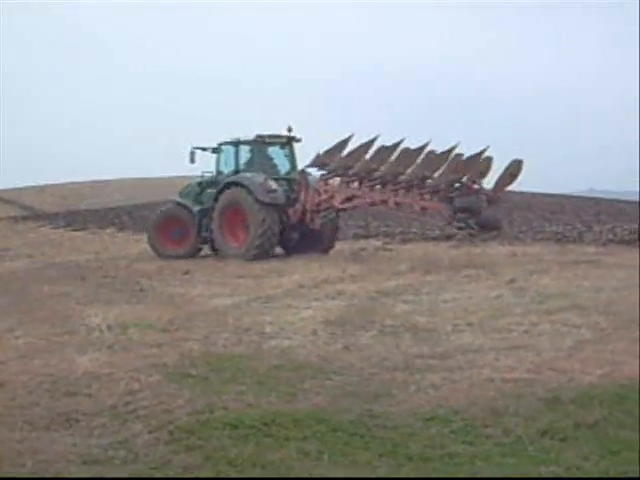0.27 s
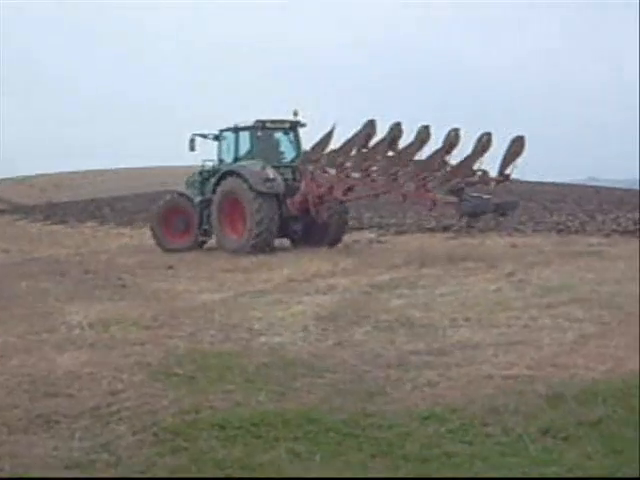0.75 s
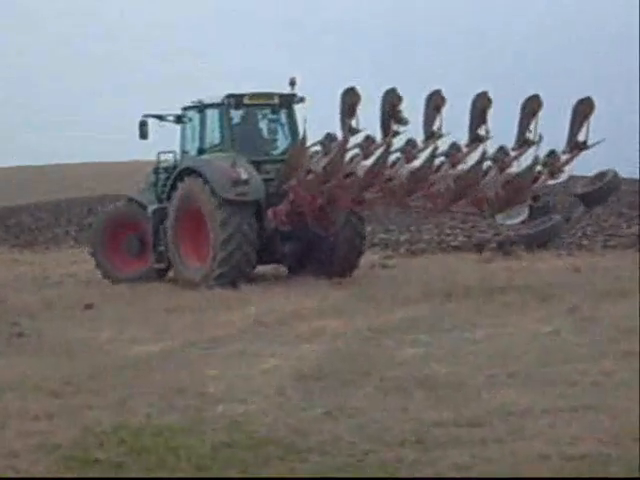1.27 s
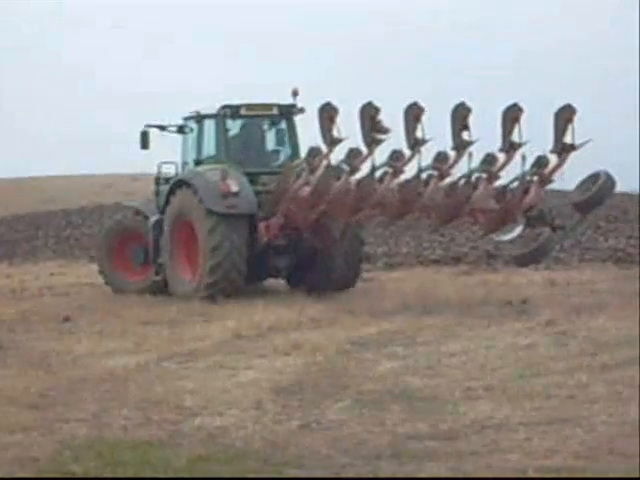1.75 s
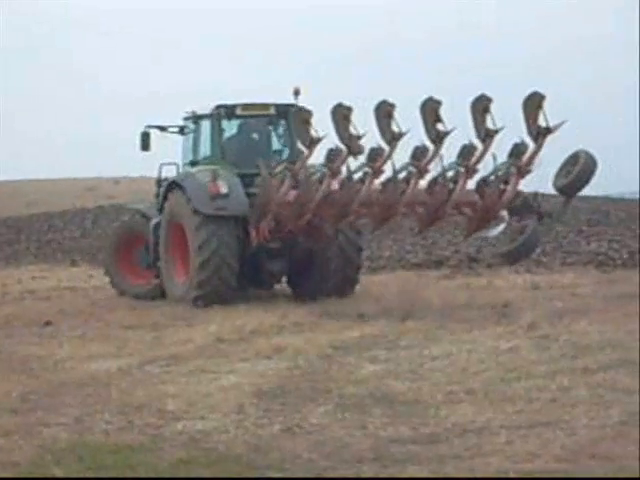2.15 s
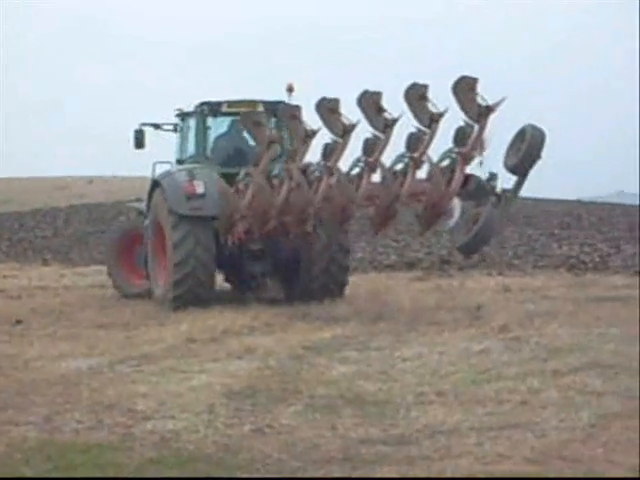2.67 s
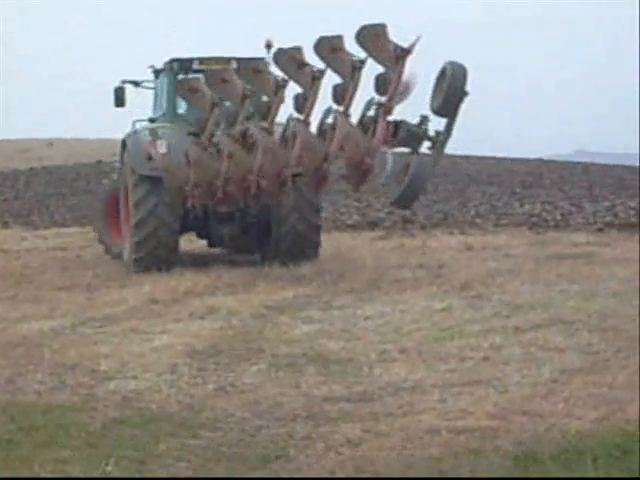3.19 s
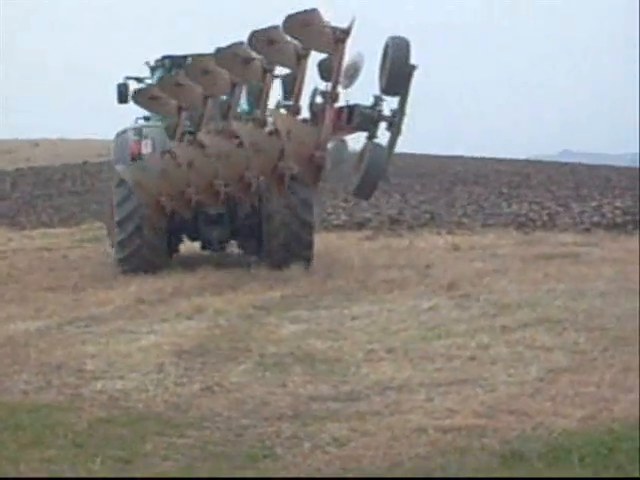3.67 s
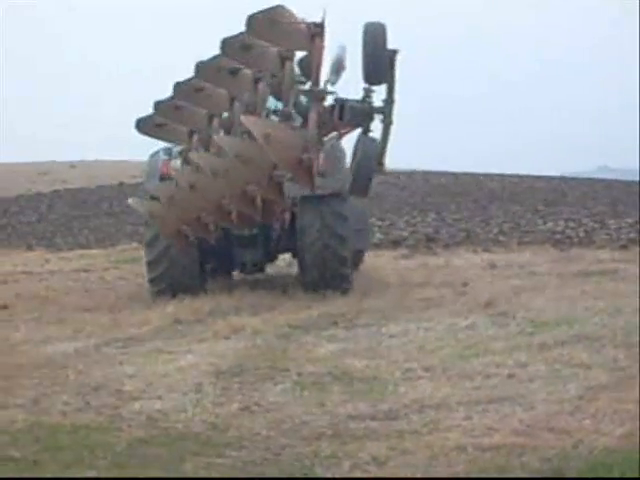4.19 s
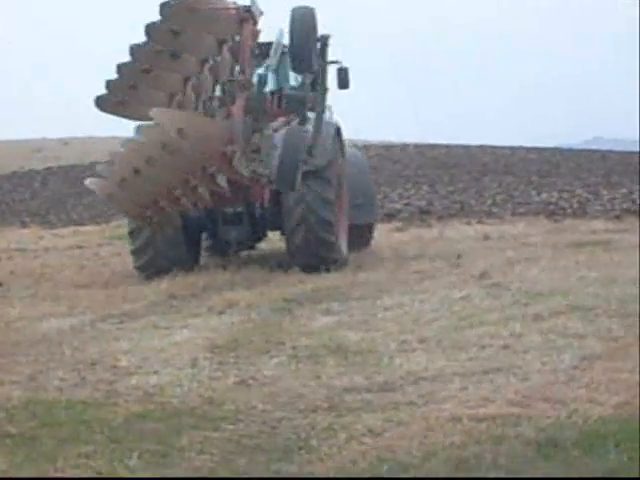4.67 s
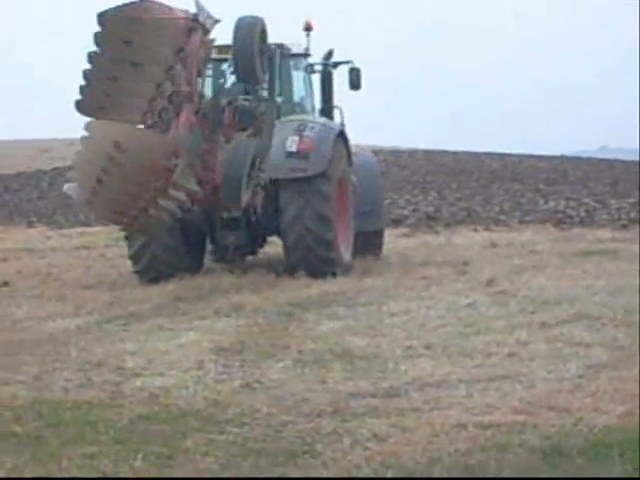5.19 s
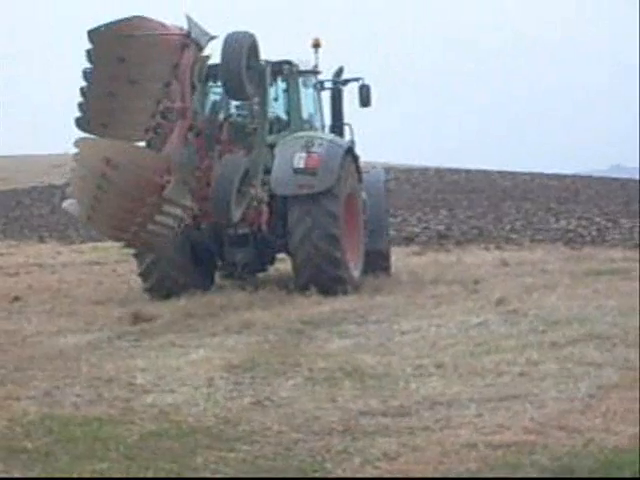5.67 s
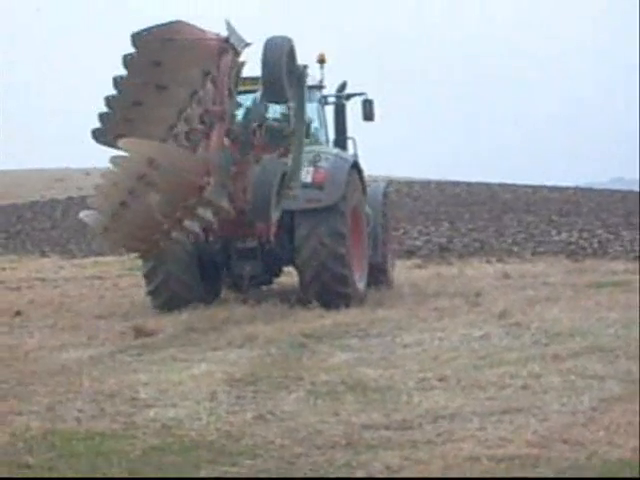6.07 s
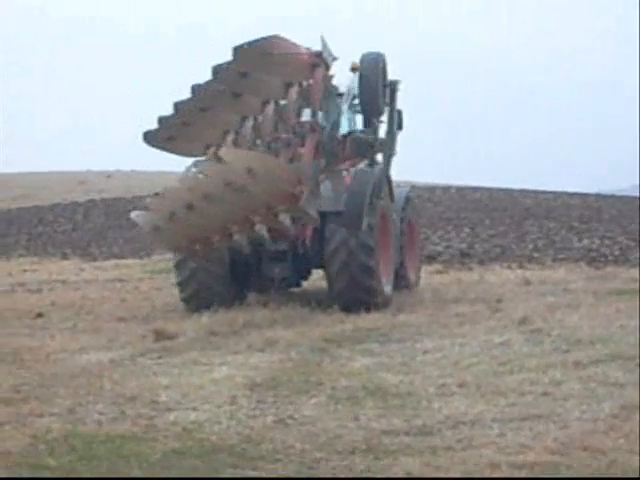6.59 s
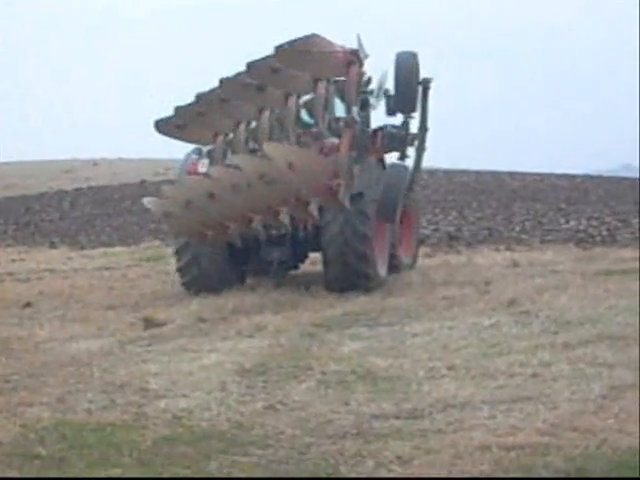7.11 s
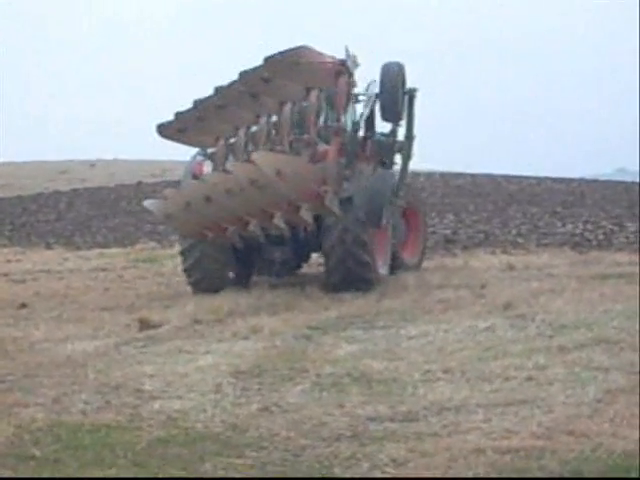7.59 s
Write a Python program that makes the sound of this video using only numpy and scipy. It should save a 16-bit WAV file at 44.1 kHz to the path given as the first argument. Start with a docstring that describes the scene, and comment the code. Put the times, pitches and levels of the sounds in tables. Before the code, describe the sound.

Outdoors, some way off, a big diesel tractor holds a nearly constant speed for about 8 seconds, a low 60-hertz hum under grainy engine noise and bright mechanical clatter. Treble hiss is strong at first, with small steel clanks at 0.1, 0.25 and 0.45. At 0.6 everything cuts to silence, returning abruptly at 1.5 with hydraulic whine and fan tones. Light clanks cluster from 1.6 to 2.5, with faint ones near 3.4. Rapid shaft knocking, about 22 per second, grows clearer as the tractor turns. Firmer clanks come at 4.2, the loudest at 4.7, with more until 5.0. The pump whine eases after 4.2, fan tones thin around 5, and hiss swells towards 5.6, with a thin tick at 5.5. More rattles follow at 5.8, a sharp clank at 6.35 and faint ones until 6.8. The engine continues, fan whine rising again near 7.4. Dry small-camera sound.

```python
"""At a field edge, some way off, a six-cylinder diesel tractor turns, its raised plough rolling over.
Exhaust beats, fan, gear and hydraulic pump tones follow the engine speed; filtered noise makes the
rumble, block noise and clatter. A shaft knocks once a turn, a treble hiss swells and sinks, and steel
parts clank as noise bursts with ringing modes. A small camera microphone drops out for a moment."""
import sys
import numpy as np
from scipy import signal
from scipy.fft import rfft, irfft
from scipy.io import wavfile
from scipy.ndimage import uniform_filter1d

SR = 44100
rng = np.random.default_rng(int(sys.argv[2]) if len(sys.argv) > 2 else 0)


def unload_audio(sound):
    """Save the sound as a 16-bit wav file, at the path given as the first command line argument."""
    columns = np.transpose(np.atleast_2d(sound))
    # keep every value between -1 and 1, then stretch to whole-number steps
    steps = np.round(np.clip(columns, -1, 1) * 32767)
    wavfile.write(sys.argv[1], SR, steps.astype(np.int16))


N = 346185


def undb(db):
    """Gain of a level in dB."""
    return 10 ** (np.asarray(db) / 20)


def curves(table):
    """Each column of a table against time, sample by sample."""
    s, *columns = np.transpose(table)
    return [np.interp(np.arange(N) / SR, s, c) for c in columns]


def white(n=N):
    """White noise of rms 1."""
    return rng.standard_normal(n)


def colour(x, points):
    """x shaped by (Hz, dB) points; white noise comes out at rms 1."""
    hz, db = np.transpose(points)
    f = np.maximum(np.arange(len(x) // 2 + 1) * SR / len(x), 1)
    gain = undb(np.interp(np.log(f), np.log(hz), db, left=-120, right=-120))
    return irfft(rfft(x) * gain / np.sqrt(np.mean(gain ** 2)), len(x))


def band(x, lo_hz, hi_hz):
    """Steep causal band-pass."""
    return signal.sosfilt(signal.butter(4, [lo_hz, hi_hz], "bandpass", fs=SR, output="sos"), x)


def walk(rate):
    """Random levels held 1 / rate s and smoothed twice; spread near 1."""
    k = int(SR / rate)
    steps = np.repeat(rng.standard_normal(400), k)[:N]
    return 1.3 * uniform_filter1d(uniform_filter1d(steps, k), k)


def sine(cycles, db):
    """A sine of rms level db, its phase given in cycles."""
    return np.sqrt(2) * undb(db) * np.sin(2 * np.pi * cycles)


def tone(cycles, db, waver_db, rate):
    """A tone around rms level db whose size and phase wander."""
    level_db = db + waver_db * walk(rate)
    return sine(cycles + 0.11 * walk(rate), level_db)


# course of the treble hiss: t/s, level/dB
HISS_SWELL_LEVEL = [(0, -54.5), (.6, -55.5), (2, -65), (3.9, -67), (4.3, -59), (5.6, -55.5), (6.7, -61),
                    (7.85, -63)]
# spectrum of the treble hiss: f/Hz, relative level/dB per Hz
HISS_SWELL_COLOUR = [(2900, -20.5), (3400, 5.5), (4100, -6), (5000, -11), (6500, -20), (8500, -23),
                     (11500, -29.5), (15500, -25.5)]


def hiss_swell():
    """Treble hiss that swells and sinks, as if the camera's gain moved, and flickers slightly."""
    return undb(curves(HISS_SWELL_LEVEL)[0] + 1.5 * walk(16)) * colour(white(), HISS_SWELL_COLOUR)


# thin sharp ticks: t/s, level before the band-pass/dB
TICK_EVENTS = [(0.4025, -46), (5.535, -35)]


def ticks():
    """Noise bursts that decay with a half-millisecond time constant, with no bass."""
    out, t = np.zeros(N), np.arange(200) / SR
    for s, level_db in TICK_EVENTS:
        i = int(s * SR)
        out[i:i + len(t)] = undb(level_db) * white(len(t)) * np.exp(-t / .0005)
    return band(out, 4000, 12000)


# steel on steel: t/s, nominal peak level/dB, then relative to it: low part level/dB, high part level/dB,
# own note f/Hz, own note level/dB; rise/s, t60/s
CLANK_EVENTS = [(.079, -31.5, -10, -23, 3810, -13, .005, .09),
                (0.2426, -26.5, -16.5, -29.5, 1540, -16, 0.0068, 0.2),
                (0.436, -32, -30, -31, 2510, -8, 0.0053, .15),
                (1.599, -27.5, -5.5, -29, 1413, -9.5, .003, 0.065),
                (1.619, -29, -13, -32, 2950, -10, 0.0041, 0.14),
                (1.661, -29.5, -18, -34, 2320, -8, .0045, .1), (1.672, -31, -24, -19, 2640, 3, .003, 0.054),
                (1.733, -29.5, -28, -36, 2650, -4, .006, .08),
                (2.079, -33.5, -11, -23, 4040, -15, 0.0053, .13),
                (2.181, -39, -13, -24, 5460, -26, 0.0064, 0.15),
                (2.251, -33, -16, -31, 4580, -26, .004, 0.14),
                (2.445, -31.5, -23, -22, 3540, -2.5, 0.0048, 0.045),
                (3.381, -41, -22, -24, 3620, -20, .0045, .1),
                (3.488, -41, -28, -16, 3600, 5.5, 0.0031, 0.075),
                (4.193, -24, -11.5, -22, 4580, -20, 0.01, 0.073),
                (4.267, -26.5, -10, -30, 1590, -5, 0.01, .13),
                (4.727, -17, -13.5, -31, 1309, -16, 0.0048, 0.15),
                (4.817, -30.5, -15, -27, 3460, -22, 0.0045, 0.11),
                (4.891, -23, -30, -32, 2880, -7, .003, 0.084),
                (4.929, -28.5, -11, -32, 1210, -27, .006, 0.41),
                (4.964, -27.5, -15, -25, 3520, -22, .006, 0.12),
                (5.813, -26.5, -17, -31, 3430, -18, .005, .065),
                (5.8644, -33, -20, -33, 2930, 3, 0.0039, 0.056),
                (5.921, -28, -14.5, -34, 3700, -24, 0.0039, 0.076),
                (6.274, -34.5, -30, -29, 4780, -25, 0.0054, 0.46),
                (6.355, -19, -22.5, -26.5, 2860, -5, .004, 0.15),
                (6.586, -39, -4.5, -36, 880, -1, .015, 0.25),
                (6.661, -33.5, -13, -26, 2060, -13, .005, 0.21),
                (6.778, -39, -6.5, -34, 3700, -10, 0.0041, 0.12)]
# ringing steel modes: f/Hz, relative level/dB, t60/s in a clank whose own t60 is 0.16 s
STEEL_MODES = [(794, -14.5, 0.37), (1292, -3, 0.17), (1615, 1, 0.17), (1926, -5.5, 0.27), (2343, -1, .18),
               (2650, 5.5, 0.083), (2780, 7.5, 0.25), (3100, -10.5, 0.091), (3020, -22.5, 0.14),
               (3370, -10.5, .15), (4170, -24, 0.22), (4240, -25.5, .15), (5000, -27, 0.15)]
# middle of a blow: f/Hz, relative level/dB per Hz
BLOW_COLOUR = [(1900, -14), (2300, -9), (2600, -3.5), (2880, 1.5), (3200, 0), (3600, -13), (4200, -23)]
TOP_BELOW_HIGH_DB = -18


def clanks():
    """Each blow rattles raggedly and rings a new mix of steel modes, plus the struck part's own note."""
    out, t = np.zeros(N + SR // 4), np.arange(SR // 4) / SR
    hz, db, ring = np.transpose(STEEL_MODES)[:, :, None]
    for s, peak_db, low_db, high_db, own_hz, own_db, rise, t60 in CLANK_EVENTS:
        noise = white(len(t))
        mix = rng.standard_normal((3, len(STEEL_MODES), 1))
        swell = np.sin(np.pi / 2 * np.minimum(t / rise, 1)) ** 2
        # loose parts chatter every few ms, so the tail is ragged
        jumps = np.interp(t, np.arange(200) * 0.003, rng.standard_normal(200))
        chatter = undb(4.0 * jumps * np.minimum(t / 0.012, 1))
        fall = 1000 ** (-np.maximum(t - rise, 0) / t60) * chatter
        middle = 0.57 * colour(noise, BLOW_COLOUR)
        low = 3.3 * undb(low_db) * band(noise, 580, 2900)
        high = 3.9 * undb(high_db) * band(noise, 3000, 5730)
        top = 2.14 * undb(high_db + TOP_BELOW_HIGH_DB) * band(noise, 6500, 14000)
        # the treble dies first
        rattle = (middle + low) * fall + (high + top) * fall ** 1.2
        # the lower modes follow the low part of the blow
        size = undb(db + 3.07 * mix[0] + np.where(hz < 2400, low_db + 15.0, 0))
        wave = np.sin(2 * np.pi * hz * (1 + 0.0121 * mix[1]) * t + np.pi * mix[2])
        modes = size * wave * 1000 ** (-t / (ring * t60 / 0.16))
        own = undb(own_db) * np.sin(2 * np.pi * own_hz * t) * 1000 ** (-t / (1.5 * t60))
        i = int((s - rise / 2) * SR)
        out[i:i + len(t)] += undb(peak_db) * swell * (rattle + 0.16 * modes.sum(axis=0) + own)
    return out[:N]


# low rumble: f/Hz, relative level/dB per Hz
RUMBLE_COLOUR = [(15, -33.5), (30, -19.5), (50, -15), (76, -11.5), (97, -6), (141, 0.5), (198, -2),
                 (333, -5), (414, -15.5), (520, -45), (680, -49)]
RUMBLE_DB = -44.5


def rumble():
    """Low noise whose level flutters."""
    return undb(RUMBLE_DB + 1.2 * walk(20)) * colour(white(), RUMBLE_COLOUR)


# bright clatter: f/Hz, relative level/dB per Hz
CLATTER_COLOUR = [(1120, -34), (1900, -8.5), (2080, -4), (2310, -10), (2520, -4), (2860, 2), (2960, 0),
                  (3930, -19), (4280, -21.5), (4620, -27), (5020, -30.5), (7000, -47.5), (9100, -65),
                  (15400, -120)]
CLATTER_DB = -42.5  # before the turn's level change


def clatter(turn_db):
    """Bright noise whose level wavers and follows the turn."""
    return undb(CLATTER_DB + turn_db + .8 * walk(12)) * colour(white(), CLATTER_COLOUR)


# engine block noise: f/Hz, relative level/dB per Hz
BLOCK_COLOUR = [(240, -27.5), (400, -12), (434, -4.5), (470, -6.5), (536, -2), (682, 2.5), (963, -5.5),
                (1020, -5.5), (1320, -3), (1420, 0), (1770, -6.5), (2030, -15), (2300, -6), (2990, -42),
                (5060, -120)]
BLOCK_DB = -47.5  # before the turn's level change


def block(turn_db, hollow_db):
    """Noise of the engine block, raised or hollowed near 1 kHz with the heading."""
    noise = colour(white(), BLOCK_COLOUR)
    near_1k = signal.filtfilt(*signal.iirpeak(1050, 3.5, SR), noise)
    noise = noise - (1 - undb(hollow_db)) * near_1k
    return undb(BLOCK_DB + turn_db + 0.74 * walk(12)) * noise


DRONE_HZ = (811, 870)
DRONE_DB, DRONE_SIDE_DB = -56.5, -11.5  # rms tail-on; change when fully side-on


def drone(side):
    """The frame drones as a narrow band of noise."""
    noise = band(white(), *DRONE_HZ)
    return undb(DRONE_DB + DRONE_SIDE_DB * side) * noise / np.std(noise)


# gears: f/multiple of firing, level/dB, waver/per s
GEAR_TONES = [(3.103, -56.5, 6), (23.45, -59, 12)]


def gears(firings):
    """Wavering tones geared to the crank."""
    return sum(tone(k * firings, db, 2.2, rate) for k, db, rate in GEAR_TONES)


# fan: t/s, lower tone level/dB, upper tone level/dB
FAN_LEVELS = [(0, -57, -60.5), (1.5, -49, -46.5), (2.2, -52.5, -52.5), (3, -50, -57), (4.1, -52.5, -44),
              (4.7, -50, -46), (5, -62, -70), (5.8, -68, -51), (6.4, -67, -52.5), (7.4, -44, -50),
              (7.85, -49.5, -43.5)]
FAN_RATIOS = (2.31, 3.54)  # lower and upper tone, multiples of firing


def fan(firings):
    """Two fan tones geared to the crank, each with its own course of level."""
    return sum(tone(k * firings, db, 0.53, 5) for k, db in zip(FAN_RATIOS, curves(FAN_LEVELS)))


# pump: f/multiple of pump rate, relative level tail-on/dB, change side-on/dB
PUMP_TONES = [(2, -9, 0), (3, -14, 0), (4, -11, 0), (5, -10, 7), (6, 4, -11), (7, -8, 0), (8, -8, 0),
              (9, -8, 0), (10, -1, 3)]
# gears of the pump: f/multiple of firing, level above the pump/dB, waver/per s
PUMP_GEAR_TONES = [(4.64, -10.5, 7.1), (5.75, -2, 5.4), (7.67, -4.5, 7), (11.6, -1.5, 6), (69.7, -13, 11)]
PUMP_RATIO = 3.435  # pump rate per firing
PUMP_DB, PUMP_IDLE_DB = -57.5, -68.5
PUMP_WORKS_S, PUMP_FADE_S = (1.2, 4.18), 0.35  # it works while the plough rolls over


def pump(firings, side):
    """The hydraulic pump whines in harmonics geared to the crank, louder while it works."""
    t = np.arange(N) / SR
    inside = np.minimum(t - PUMP_WORKS_S[0], PUMP_WORKS_S[1] - t)
    working = np.clip(inside / PUMP_FADE_S + 1, 0, 1)
    whine = sum(tone(k * PUMP_RATIO * firings, db + side_db * side, 2.5, 11)
                for k, db, side_db in PUMP_TONES)
    mesh = sum(tone(k * firings, db, 2.2, rate) for k, db, rate in PUMP_GEAR_TONES)
    return undb(PUMP_IDLE_DB + (PUMP_DB - PUMP_IDLE_DB) * working) * (whine + mesh)


# housing notes of the knock: f/Hz, relative level/dB
KNOCK_NOTES = [(2150, -6.5), (2500, -2.5), (2690, -5.5), (2880, -2.5)]
# what rattles after it: f/Hz, relative level/dB per Hz
REBOUND_COLOUR = [(2300, -16.5), (2650, -9.5), (2900, 8.5), (3150, -16.5), (3600, -33)]
SHAFT_RATIO, SHAFT_START = .37178, .277  # turns of the knocking shaft per firing; turns at the start
KNOCK_DB, KNOCK_SIDE_DB = -44.5, -23.5  # before the heading acts; change when fully side-on
KNOCK_HEADING, KNOCK_SPREAD = 30.3, 36  # degrees: the knock is clearest from a rear quarter


def knock(firings, heading, side, hollow_db):
    """One short blow a shaft turn rings the housing, its notes varying a little; a faint rattle follows."""
    turns = SHAFT_START + SHAFT_RATIO * firings
    phase = turns % 1
    since = phase / np.gradient(turns) / SR  # seconds since the blow
    chance = rng.standard_normal((200, len(KNOCK_NOTES), 3))[turns.astype(int)].T
    notes = 0
    for k, (hz, db) in enumerate(KNOCK_NOTES):
        # the plough screens the lower notes once it stands behind the engine
        size = undb(db + 1.8 * chance[0, k] + (hz < 2600) * 1.1 * hollow_db)
        note_hz = hz * (1 + .018 * chance[1, k])
        notes = notes + size * np.sin(2 * np.pi * note_hz * since + np.pi * chance[2, k])
    blow = np.exp(-(phase / .25) ** 2) * np.minimum(phase / .08, 1)
    rattle = .35 * np.exp(-((phase - .42) / .1) ** 2)
    sound = blow * notes + rattle * colour(white(), REBOUND_COLOUR)
    off_quarter = (np.abs(heading) - KNOCK_HEADING) / KNOCK_SPREAD
    level_db = KNOCK_DB + KNOCK_SIDE_DB * side ** 14 - off_quarter ** 2
    return undb(level_db) * sound / np.std(sound)


# exhaust overtones: f/multiple of firing, relative level/dB
EXHAUST_OVERTONES = [(2, -25), (3, -3.5), (4, -1.5), (5, -5.5)]
BEAT_DB = -51  # rms of the beat
OVERTONES_DB, PIPE_SIDE_DB = -60.5, 27  # tail-on; change when the pipe side fully shows


def exhaust(firings, side):
    """A clean beat at the firing rate; the overtones grow when the pipe faces this way."""
    beat = sine(firings, BEAT_DB + 0.25 * walk(2.7))
    overtones = sum(tone(k * firings, db, 1.5, 5) for k, db in EXHAUST_OVERTONES)
    pipe = np.maximum(-side, 0.16 * side ** 2)
    return beat + undb(OVERTONES_DB + PIPE_SIDE_DB * pipe) * overtones


# engine speed: t/s, firing rate f/Hz
ENGINE_SPEED = [(0, 60.4), (1.5, 60.1), (2.05, 59.9), (2.45, 61), (3, 60.6), (3.4, 61.1), (4.1, 59.4),
                (4.75, 59.5), (5.25, 58.8), (6.05, 59), (6.5, 60.5), (7.05, 59.9), (7.85, 60)]
# the turn: t/s, heading from tail-on/degrees (negative = pipe side shows),
# level change of block and clatter/dB
TRACTOR_TURN = [(0, 83, 4), (1.5, 69, 2), (2.2, 67.5, 0), (3.2, 42.5, 0), (3.9, 13, -1.5), (4.5, 13, 2),
                (5.2, 1, 0.5), (6.2, -26, 1), (7.85, -30, 0)]
HOLLOW_DB = (2, -3.5)  # block near 1 kHz: side-on, tail-on


def scene():
    """Tractor and plough in the open; the heading decides which parts face this way."""
    firings = np.cumsum(curves(ENGINE_SPEED)[0]) / SR
    heading, turn_db = curves(TRACTOR_TURN)
    side = np.sin(np.radians(heading))
    far_side = np.maximum(side, 0)  # how far the side without the pipe shows
    hollow_db = HOLLOW_DB[1] + (HOLLOW_DB[0] - HOLLOW_DB[1]) * far_side
    details = hiss_swell() + ticks() + clanks()
    body = rumble() + clatter(turn_db) + block(turn_db, hollow_db)
    drives = drone(far_side) + gears(firings) + fan(firings) + pump(firings, far_side)
    engine = knock(firings, heading, side, hollow_db) + exhaust(firings, side)
    return (details + body + drives + engine)[None]


# steady hiss: f/Hz, relative level/dB per Hz
HISS_COLOUR = [(3000, -37.5), (5000, -3), (7660, -13.5), (11200, -15.5), (14900, -16), (15800, -15)]
# whine of the camera electronics: f/Hz, level/dB
WHINE_TONES = [(8786, -93), (8845, -93.5), (13205, -102), (13264, -99.5)]
HISS_DB = -69.5
DROPOUT_S = (.6141, 1.4966)  # silence begins, sound begins to return
TOP_HZ = 15600


def record(dry):
    """The camera adds hiss and thin whines, falls silent for a moment and cuts the top."""
    t = np.arange(N) / SR
    hiss = undb(HISS_DB) * colour(white(), HISS_COLOUR)
    whine = sum(sine(hz * t, db) for hz, db in WHINE_TONES)
    # shuts in 0.3 ms, reopens over 2 ms
    on = np.clip(np.maximum((DROPOUT_S[0] - t) / .0003, (t - DROPOUT_S[1]) / .002), 0, 1)
    top_cut = signal.ellip(14, .2, 60, TOP_HZ, fs=SR, output="sos")
    return signal.sosfilt(top_cut, (dry + hiss + whine) * on)


dry = scene()
out = record(dry)
unload_audio(out)
```